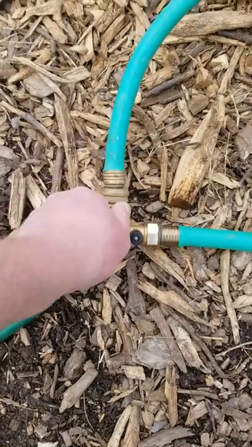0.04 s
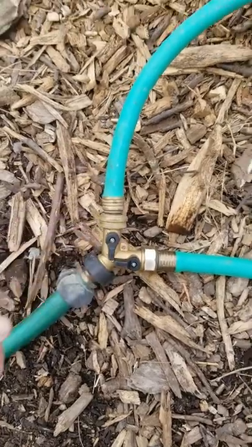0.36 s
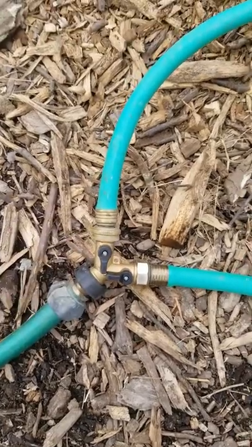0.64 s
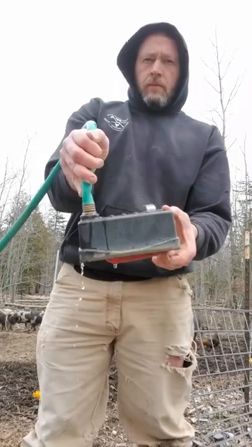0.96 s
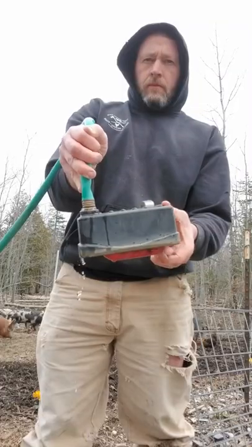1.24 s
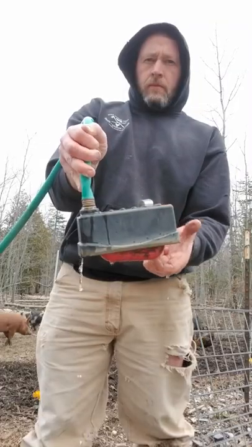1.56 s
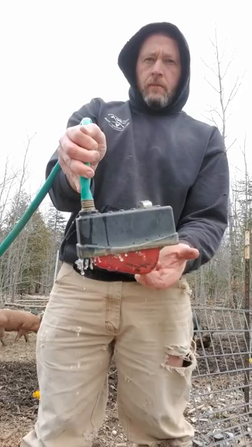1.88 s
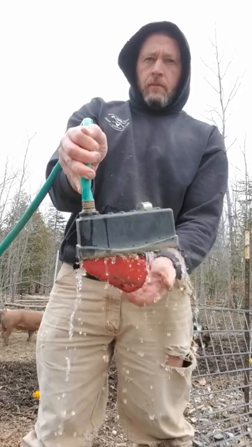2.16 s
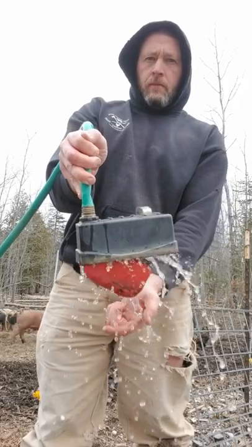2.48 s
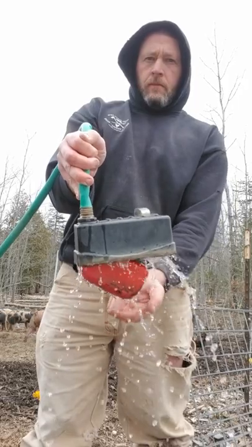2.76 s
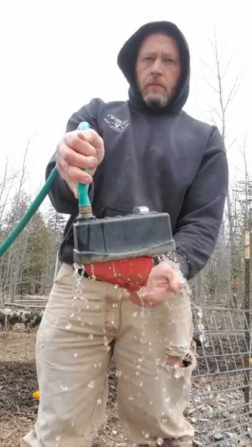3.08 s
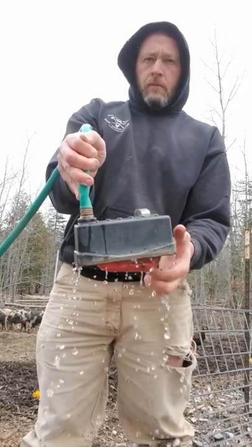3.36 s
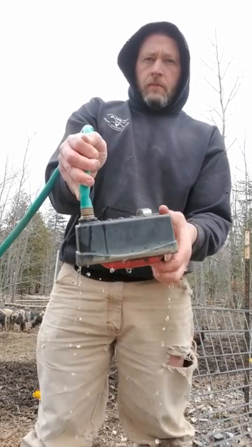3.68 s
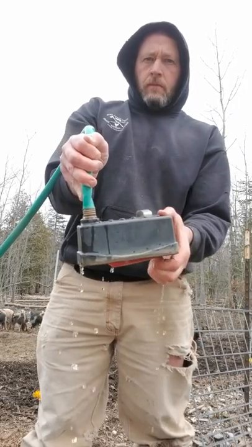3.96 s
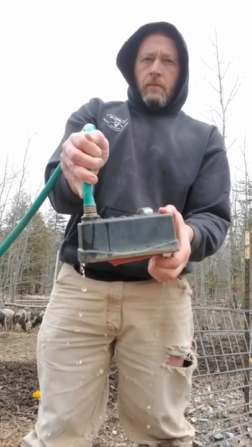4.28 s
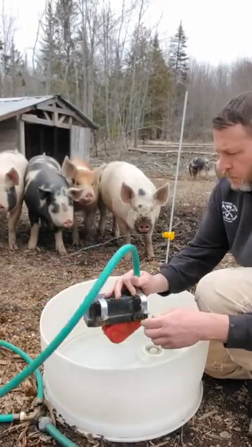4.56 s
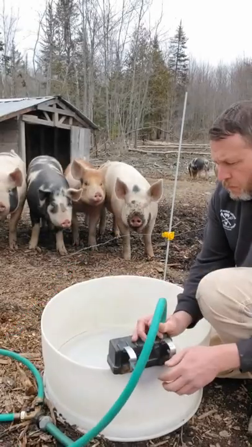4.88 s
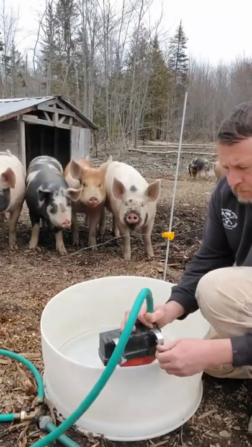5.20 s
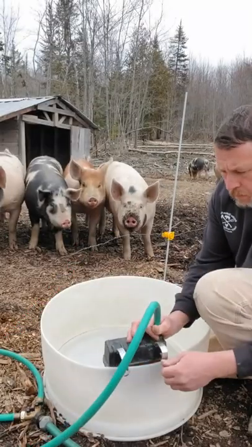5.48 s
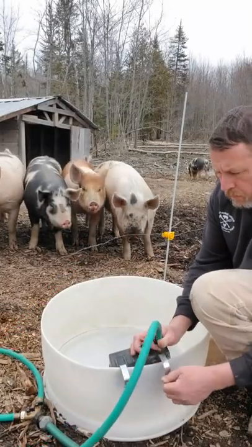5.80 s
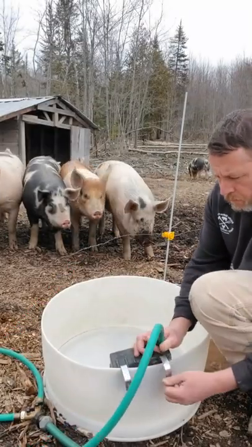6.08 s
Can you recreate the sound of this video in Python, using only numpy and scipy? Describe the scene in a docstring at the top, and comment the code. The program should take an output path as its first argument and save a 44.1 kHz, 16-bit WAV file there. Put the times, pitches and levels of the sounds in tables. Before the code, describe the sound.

Light wind rumbles on the microphone throughout, outdoors in a farmyard. At the start a brass hose tap opens: water surges into the hose with a hiss and a faint whistle that sink in pitch, cutting off at about 0.75 seconds. A few faint drips follow. At 1.7 seconds water starts spraying inside a plastic float valve, with a fine fizz, and from about 2.2 seconds big drops slap and patter on the ground. The spray closes off by 3.5 seconds and the drips thin out until about 4.7. A hen clucks hoarsely about four times a second from 1.6 to 4 seconds, then squawks once until 4.4. Around 4.8 seconds the valve clatters loudly onto the rim of an empty plastic tub, with a short hollow ring. More knocks, with light scraping and a rattle from its metal bracket, come near 5.6, 5.8 and 6.1 seconds.

```python
"""A hand-held float valve drips, sprays inside its plastic housing as the float drops, then shuts and
drips on the ground. Before it, a brass hose tap opens: its eddies hiss and whistle, water rushes in the
hose. A hen clucks over the spray and ends on a squawk. Last, the valve is knocked onto the rim of an
empty plastic tub, ringing wall and bracket. Light farmyard wind buffets the microphone throughout."""
import sys
import numpy as np
from scipy import signal
from scipy.fft import rfft, irfft
from scipy.io import wavfile
from scipy.ndimage import uniform_filter1d

SR = 44100
rng = np.random.default_rng(int(sys.argv[2]) if len(sys.argv) > 2 else 0)


def persist_wave(psi):
    """Save psi, clipped to +-1, as 16-bit WAV."""
    counts = np.round(np.clip(psi, -1, 1) * 32767).astype(np.int16)
    wavfile.write(sys.argv[1], SR, np.atleast_2d(counts).T)


N = 275184
T = np.arange(N) / SR

# breeze strength (time [s], level [dB])
BREEZE = [(0, -36.5), (.55, -39), (.9, -44.5), (1.5, -39), (2.2, -45.5), (2.6, -38.5), (3.3, -50),
          (3.75, -42.5), (4.4, -45.5), (5.25, -53.5), (5.6, -40.5), (6.24, -43.5)]
# strongest wind eddies (time [s], peak [dB], frequency [Hz])
WIND_PUFFS = [(0.066, -28, 59.6), (0.276, -27.5, 76), (.34, -25, 69), (.414, -26, 70.7),
              (0.516, -23.5, 64.5), (0.741, -28.5, 100), (1.402, -30.5, 116), (1.797, -29, 87),
              (3.162, -30, 70.4), (3.759, -30.5, 78), (4.395, -31.5, 91.5), (5.904, -26, 99.8)]
# wind rumble, yard hush (frequency [Hz], density [dB])
BUFFET_SPECTRUM = [(12, -30), (20, -12), (59, -1), (87, -1.5), (270, -22), (386, -32), (433, -38),
                   (451, -35), (600, -60.5), (780, -80), (1320, -120)]
YARD_SPECTRUM = [(290, -29.5), (500, -1.5), (570, -12.5), (649, -10.5), (698, -9.5), (2980, -25.5),
                 (6800, -19), (8960, -35), (12000, -19), (16000, -14.5)]

# clucks (centre [s], level [dB])
HEN_CLUCKS = [(1.632, -40.5), (1.848, -34), (2.068, -33.5), (2.302, -33), (2.553, -33), (2.821, -32),
              (3.069, -29.5), (3.35, -29), (3.681, -29.5), (3.955, -30)]
# squawk contour (time [s], pitch [Hz], level [dB], roughness [0-1])
HEN_SQUAWK = [(4.02, 407, -41, 0.48), (4.055, 494.1, -26.5, 0.39), (4.085, 526, -26.5, .15),
              (4.137, 516.4, -23, 0.01), (4.155, 471, -27.5, 0.08), (4.243, 461.6, -29, 0.17),
              (4.32, 566.7, -20.5, 0.03), (4.333, 520, -29.5, 0.76), (4.365, 538, -29.5, 0.6)]
# hen's throat (frequency [Hz], gain [dB])
THROAT_RESPONSE = [(250, -30.5), (480, -18), (700, -18.5), (950, -2.5), (1130, 3), (1450, -22.5),
                   (1950, -20.5), (2400, -14.5), (2800, -35.5), (3300, -55.5), (3800, -32), (4600, -46),
                   (5600, -31), (7000, -53)]

# hand grip on the valve, then blows on the tub (time [s], peak [dB], wall cutoff [Hz], contact [s], thud [dB],
# bracket [dB])
TUB_KNOCKS = [(4.565, -33.5, 2970, 0.022, -30, 6.5), (4.792, -32.5, 5058, 0.0085, -16, 0),
              (4.81, -7.5, 1266, 0.003, 2.5, -8.5), (4.8152, -5, 16160, 0.0035, -22.5, -11),
              (4.829, -12, 2000, 0.0034, -19, -9.5), (4.861, -23, 1190, .0063, -18, -20),
              (4.941, -22.5, 1005, 0.002, -5.5, -29), (5.5852, -12.5, 2640, 0.0054, 5, 5.5),
              (5.631, -15.5, 2600, 0.0062, -7, -2), (5.729, -40.5, 2480, .004, -13.5, 17),
              (5.8066, -18, 1240, 0.00091, -17, -30), (6.078, -43.5, 3050, 0.0064, -6, 10.5),
              (6.148, -20.5, 6060, 0.006, -2.5, -2), (6.221, -31.5, 4000, 0.014, -16, -8)]
# wall modes (frequency [Hz], level [dB], t60 [s])
WALL_MODES = [(199.4, -4.5, 0.27), (308.6, -13, .2), (385, -9.5, 0.15), (442, -8.5, 0.18),
              (483, -23.5, 0.25), (553, -3, 0.097), (604, 2.5, 0.067), (637, 2, 0.1), (754, -17, 0.063),
              (820.5, 7, 0.063), (862.5, 1, 0.12), (920, -19, 0.075), (1420, -12, 0.12), (1508, -1, 0.052),
              (1903, -6.5, 0.054), (1970, -24, 0.092), (2640, -2, .08), (3390, -12.5, .1),
              (5460, -28, 0.095)]
# whole tub flexing (frequency [Hz], t60 [s])
FLEX_MODES = [(183, 0.17), (217, .2)]
# metal bracket resonances (frequency [Hz], nominal width [Hz], level [dB])
BRACKET_MODES = [(1394, 266, 3), (1797, 220, -9.5), (2484, 220, -3.5), (2840, 440, -4), (5090, 720, -7.5),
                 (6980, 570, -8.5), (13600, 4000, -15.5)]
# bracket pushed along the rim (peak time [s], level [dB])
RIM_PUSHES = [(4.62, -51), (4.9, -46), (5.163, -53.5), (5.521, -54), (5.579, -35.5), (5.812, -46.5),
              (6.16, -53.5)]
# contact chatter, rim friction (frequency [Hz], density [dB])
CLACK_SPECTRUM = [(59, -40), (100, -19.5), (189, -7), (335, -13), (836, -15.5), (1170, -11), (1480, -15.5),
                  (1760, -31), (2580, -25), (2990, -34.5), (4770, -17.5), (8460, -45.5), (16000, -42)]
SCRAPE_SPECTRUM = [(120, -38), (200, -18), (373, -11.5), (851, -3), (950, -13.5), (1350, -11), (1870, -20),
                   (3900, -21), (5730, -26), (8580, -43), (16000, -35)]

# tap's glide as the lever turns (time [s], hiss centre [Hz], whistle pitch [Hz])
TAP_GLIDE = [(0, 2894, 3070), (.08, 3200, 3380), (.2, 3210, 3200), (.33, 2644, 2760), (.44, 2113, 2060),
             (.54, 1928, 2043), (.66, 1780, 1934), (.75, 1920, 2075)]
# hiss bands (multiple of centre [ratio], initial level [dB], open level [dB])
HISS_BANDS = [(1, -4, 1.5), (0.899, -13, 3.5), (1.197, -17, -12), (1.998, -11, -6), (2.14, -19, -10),
              (3.08, -17, -67)]
# eddies locking into a whistle (centre [s], level [dB], half length [s])
WHISTLE_SWELLS = [(0.284, -46, 0.053), (.485, -46, .045), (0.633, -50, 0.077), (0.75, -43.5, .04)]
# water in the hose (frequency [Hz], density [dB])
HOSE_SPECTRUM = [(180, -38), (300, -2), (885, 11), (1040, 3.5), (2030, -4), (2320, -18), (2570, 1),
                 (3130, -12), (3950, -9), (6960, -14.5), (9090, -34), (12300, -23), (16000, -29)]

# big drops on the ground (time [s], peak [dB], ring [Hz])
BIG_DROPS = [(1.0298, -45, 4860), (1.074, -49, 5490), (1.3484, -47.5, 6100), (1.6336, -42.5, 6660),
             (2.1547, -24.5, 2620), (2.4775, -18, 4000), (2.557, -21, 3580), (2.846, -17.5, 3900),
             (2.8752, -19.5, 3450), (3.246, -26, 4070), (3.2551, -20.5, 2750), (3.2795, -23, 4150),
             (3.3493, -28.5, 6700), (3.408, -15.5, 5300), (3.4189, -22.5, 3160), (3.482, -21, 2965),
             (3.5102, -31, 11698), (3.5337, -30.5, 5960), (3.606, -38, 6980), (3.6436, -24.5, 3400),
             (3.6709, -25.5, 5950), (3.691, -24, 2520), (3.7911, -25.5, 4430), (3.8123, -25, 3060),
             (3.827, -30.5, 3680), (3.9154, -20, 5940), (3.9735, -27, 11700), (4.0893, -24, 2500),
             (4.2544, -30.5, 2498), (4.278, -31, 2498), (4.5208, -31.5, 5870), (4.744, -39.5, 3068)]
# squirts at closing (centre [s], level [dB], half length [s], frequency [Hz], stage width [Hz])
VALVE_SQUIRTS = [(3.248, -38, 0.011, 3580, 1491), (3.287, -46, 0.0082, 428, 90)]
# housing cavity resonances (frequency [Hz], width [Hz], level [dB])
HOUSING_MODES = [(838.6, 45, -2.5), (1310, 120, -8.5), (2660, 190, -24), (3210, 150, -9.5),
                 (3660, 530, -7.5), (4240, 340, -8.5)]
# drop splat, fine mist, valve jet (frequency [Hz], density [dB])
SPLAT_SPECTRUM = [(880, -39), (1500, -17.5), (2160, -13.5), (3000, -8), (4830, -7), (6960, -2), (9560, -21),
                  (10800, -8.5), (12400, -11), (16000, -21)]
MIST_SPECTRUM = [(2940, -12.5), (5000, -15.5), (6100, -1.5), (9410, 0), (11100, 3), (12300, 5.5),
                 (15200, 9.5), (16000, -38)]
JET_SPECTRUM = [(120, -51), (200, -44), (384, -19), (496, -14.5), (682, -14), (812, -2), (938, -13),
                (1310, -10.5), (2110, -8.5), (2290, -4), (2900, -11.5), (3200, -7), (7090, -25),
                (9000, -37), (11700, -74), (19800, -120)]

FLOAT_DROP_S, OPENING_S = 1.715, 0.12
FLOAT_SHUT_S, CLOSING_S = 3.525, 0.52


def undb(db):
    """Decibels to gain."""
    return 10 ** (np.asarray(db) / 20)


def unit(x):
    """Scale to rms 1."""
    return x / np.sqrt(np.mean(x ** 2) + 1e-20)


def noise():
    """White noise, scene length."""
    return rng.standard_normal(N)


def curves(table):
    """Columns interpolated linearly over time."""
    times_s, *columns = np.transpose(table)
    return [np.interp(T, times_s, column) for column in columns]


def gate(start_s, end_s, edge_s):
    """Window with linear edges."""
    return np.clip((T - start_s) / edge_s, 0, 1) * np.clip((end_s - T) / edge_s, 0, 1)


def ramp(start_s, length_s):
    """Smooth rise, 0 to 1."""
    return np.sin(np.pi / 2 * np.clip((T - start_s) / length_s, 0, 1)) ** 2


def swell(centre_s, half_s):
    """Gaussian envelope."""
    return np.exp(-((T - centre_s) / half_s) ** 2)


def decay(t, t60_s):
    """Exponential fall, 60 dB per t60_s."""
    return np.exp(-np.log(1000) * t / t60_s)


def walk(rate_hz):
    """Smooth random wander, rms 1."""
    step = max(int(SR / rate_hz), 1)
    held = np.repeat(rng.standard_normal(N // step + 1), step)
    return unit(uniform_filter1d(held, step)[:N])


def gain_at(hz, spectrum):
    """Spectrum gain, interpolated over log frequency."""
    points_hz, db = np.transpose(spectrum)
    return undb(np.interp(np.log(hz + 1), np.log(points_hz), db))


def colour(x, spectrum):
    """Minimum-phase filter with the given spectrum."""
    size = 8192
    cepstrum = irfft(np.log(gain_at(np.arange(size // 2 + 1) * SR / size, spectrum)))
    cepstrum[1:size // 2] *= 2
    cepstrum[size // 2:] = 0
    impulse = irfft(np.exp(rfft(cepstrum)))[:size // 2]
    return signal.fftconvolve(x, impulse)[:len(x)]


def resonate(x, hz, width_hz):
    """One resonance, unity peak gain."""
    return signal.lfilter(*signal.iirpeak(hz, hz / width_hz, fs=SR), x)


def band(x, hz, width_hz, second_width_hz=None):
    """Two resonators in series, output rms 1."""
    return unit(resonate(resonate(x, hz, width_hz), hz, second_width_hz or width_hz))


def lowpass(x, hz):
    """Two-pole low-pass."""
    return signal.lfilter(*signal.butter(2, hz, fs=SR), x)


def add(out, start_s, x):
    """Mix x in at start_s."""
    i = int(start_s * SR)
    out[i:i + len(x)] += x[:N - i]


def place(x, pan_db, lag_ms, wet_db, t60_s):
    """Stereo direct sound plus scattered reflections; pan and lag are left relative to right."""
    t = T[:SR // 2]
    left = np.roll(x, round(lag_ms * SR / 1000))
    tails = rng.standard_normal((2, len(t))) * decay(t, t60_s) * (t > .002)
    tails /= np.linalg.norm(tails, axis=1, keepdims=True)
    wet = signal.fftconvolve(x[None], tails, axes=1)[:, :N]
    return (np.array([left, x]) + undb(wet_db) * wet) * undb([[pan_db / 2], [-pan_db / 2]])


def wind():
    """Gusts buffet each microphone port separately, over the yard's hush."""
    gust = undb(curves(BREEZE)[0] + 1.5 * walk(12))
    ports = []
    for _ in range(2):
        rumble = gust * unit(colour(noise() * undb(5.1 * walk(25)), BUFFET_SPECTRUM))
        for time_s, db, hz in WIND_PUFFS:  # about one pressure swing per eddy
            phase = 2 * np.pi * hz * (T - time_s) + 0.62 * rng.standard_normal()
            rumble += undb(db) * swell(time_s, 0.62 / hz) * np.cos(phase)
        hush = undb(-66) * unit(colour(noise(), YARD_SPECTRUM))
        ports.append(rumble + hush)
    return np.array(ports) * undb([[-.7], [.7]])


def syrinx(hz, rough):
    """Harmonics shaped by the throat; roughness shakes pitch and level and adds rasp."""
    jitter = 1 + .045 * rough * walk(420) + .009 * walk(110)
    phase = 2 * np.pi * np.cumsum(hz * jitter) / SR
    tone = sum(gain_at(k * hz, THROAT_RESPONSE) * np.sin(k * phase) for k in range(1, 15))
    tone /= np.sqrt(uniform_filter1d(tone ** 2, SR // 100) + 1e-9)
    rattle = 1 + 1.04 * rough * np.sin(0.33 * phase + 1.6 * walk(90))  # second, slower membrane
    rasp = unit(colour(noise() * (1 + np.cos(phase)), THROAT_RESPONSE))
    hiss = band(noise(), 2200, 1100) * undb(-15)
    shimmer = undb(2 * rough * walk(260))
    return tone * rattle * shimmer + (.14 + .7 * rough) * rasp + rough * hiss


def hen():
    """Hoarse clucks arch and droop in pitch, then one squawk; shed and trees echo."""
    cluck_hz, droop, arch = 499, .15, .45
    first_half_span_s, growth = .058, .02
    hz, envelope = np.full(N, float(cluck_hz)), np.zeros(N)
    for k, (centre_s, db) in enumerate(HEN_CLUCKS):
        offset = (T - centre_s) / (first_half_span_s * (1 + growth * k))
        near = np.abs(offset) < 1
        offset = offset[near]
        hz[near] = cluck_hz * (1 - droop * offset - arch * offset ** 2).clip(.5)
        envelope[near] += undb(db) * np.exp(-(offset / 0.29) ** 2)
    clucks = lowpass(envelope * syrinx(hz, rough=.38), 1550)  # beak nearly shut
    squawk_hz, squawk_db, rough = curves(HEN_SQUAWK)
    calls = clucks + undb(squawk_db) * gate(3.98, 4.388, 0.02) * syrinx(squawk_hz, rough)
    shed = undb(-12.5) * np.roll(calls, int(0.034 * SR))
    trees = place(calls, pan_db=-2.5, lag_ms=0, wet_db=21, t60_s=0.68) * undb(-36)
    # trees still ringing from an earlier call
    far_ring = band(noise(), 1040, 280) * undb(-68) * ramp(.755, 0.014) * decay(T - .755, 2)
    return place(calls + shed + far_ring, pan_db=0.7, lag_ms=-.07, wet_db=-28.5, t60_s=0.3) + trees


def knock(cutoff_hz, contact_s, thud_db, bracket_db):
    """One blow rings tub wall and bracket; longer contact, slower attack. Peak 1."""
    t = T[:SR // 2]
    mode_hz, mode_db, t60_s = np.transpose(WALL_MODES)[:, :, None]
    # random strike point
    weights = undb(mode_db + 0.86 * rng.standard_normal(mode_db.shape))
    weights *= rng.choice([-1, 1], mode_db.shape)
    ring = np.sum(weights * np.sin(2 * np.pi * mode_hz * t) * decay(t, t60_s), axis=0)
    chatter = rng.standard_normal(len(t)) * (decay(t, 8 * contact_s) + undb(-19) * decay(t, 0.17))
    wall = lowpass(unit(ring) + unit(colour(chatter, CLACK_SPECTRUM)), cutoff_hz)
    thud = unit(sum(np.sin(2 * np.pi * hz * t) * decay(t, ring_s) for hz, ring_s in FLEX_MODES))
    bracket = unit(sum(undb(db) * band(chatter, hz, width_hz, 2 * width_hz)
                       for hz, width_hz, db in BRACKET_MODES))
    attack = 1 - decay(t, 2.13 * contact_s)
    blow = (wall + undb(thud_db) * thud + undb(bracket_db - 1) * bracket) * attack
    return blow / np.abs(blow).max()


def tub():
    """The valve clatters on the tub; its bracket scrapes the rim and squeaks once."""
    rise_db_per_s, fall_db_per_s = 203.5, 198
    knocks = np.zeros(N)
    for time_s, db, *contact in TUB_KNOCKS:
        add(knocks, time_s, undb(db) * knock(*contact))
    friction = noise() * undb(1.85 * rng.exponential(size=N) + 2.34 * walk(110))
    pressure = sum(undb(db - np.maximum(rise_db_per_s * (peak_s - T), fall_db_per_s * (T - peak_s)))
                   for peak_s, db in RIM_PUSHES)
    scrape = unit(colour(friction, SCRAPE_SPECTRUM)) * pressure
    squeak = band(friction, 5200, 670, 840) * undb(-48.5) * gate(5.495, 5.56, .02)
    return place(knocks + scrape + squeak, pan_db=3.5, lag_ms=.1, wet_db=-9, t60_s=0.088)


def tap():
    """Ball-valve eddies hiss and whistle, sinking as the gap widens; water surges into the hose."""
    centre_hz, whistle_hz = curves(TAP_GLIDE)
    opening = ramp(start_s=0.23, length_s=0.43)
    phase = 2 * np.pi * np.cumsum(centre_hz) / SR
    hiss = np.zeros(N)
    for multiple, first_db, open_db in HISS_BANDS:
        baseband = lowpass(noise() + 1j * noise(), 110 * np.sqrt(multiple))
        eddies = unit(np.real(baseband * np.exp(1j * multiple * phase)))
        hiss += undb(first_db + (open_db - first_db) * opening) * eddies
    hiss *= undb(-47 - 5.5 * opening + 0.81 * walk(110.8))
    lock = sum(undb(db) * swell(centre_s, half_s) for centre_s, db, half_s in WHISTLE_SWELLS)
    whistle_phase = 2 * np.pi * np.cumsum(whistle_hz) / SR + .85 * walk(110)
    whistle = np.sqrt(2) * np.sin(whistle_phase) * lock * undb(3 * walk(70))
    rush = unit(colour(noise(), HOSE_SPECTRUM))
    rush += undb(-3) * unit(resonate(noise(), 950, 130)) * decay(T, 1.3)
    rush *= undb(-46.5 - 10 * opening)
    surge = band(noise(), 770, 270)
    surge = unit(resonate(resonate(noise(), 770, 270), 360, 570)) * undb(-24.5) * decay(T, 0.15)
    bubbles = unit(colour(noise() * undb(3.8 * walk(118.5)), MIST_SPECTRUM))
    bubbles *= undb(-68.5) * (1 - .5 * opening)
    water = (hiss + whistle + rush + surge + bubbles) * gate(0, 0.7534, 0.00078)
    return place(water, pan_db=-1.5, lag_ms=.36, wet_db=1, t60_s=0.021)


def valve_flow():
    """The float falls open, then is lifted shut: 0 shut, 1 open."""
    return ramp(FLOAT_DROP_S, OPENING_S) * np.clip((FLOAT_SHUT_S - T) / CLOSING_S, 0, 1)


def drips():
    """Big drops slap the ground; droplets patter as the housing drains and leaks."""
    drain_s, fall_s = 0.49, 0.3
    full_flow_drops_per_s, leak_drops_per_s = 420, 30
    t, splats = T[:SR // 16], np.zeros(N)
    for time_s, db, hz in BIG_DROPS:
        burst = rng.standard_normal(len(t)) * (decay(t, .0025) + undb(-18) * decay(t, .028))
        splat = colour(burst, SPLAT_SPECTRUM)
        splat = resonate(splat, hz, 0.22 * hz) + undb(-9.5) * splat
        add(splats, time_s, undb(db) * splat / np.abs(splat).max())
    pole = np.exp(-1 / (drain_s * SR))
    runoff = signal.lfilter([1 - pole], [1, -pole], valve_flow())
    landing = np.interp(T - fall_s, T, runoff)
    sizes = undb(5 * np.minimum(rng.exponential(size=N), 3))
    droplets = (rng.random(N) < (full_flow_drops_per_s * landing + leak_drops_per_s) / SR) * sizes
    fizz = noise() * signal.fftconvolve(droplets, decay(t, .012) + undb(-13) * decay(t, .055))[:N]
    patter = unit(colour(fizz, SPLAT_SPECTRUM)) + undb(-9) * unit(colour(fizz, MIST_SPECTRUM))
    patter *= (undb(-58) * np.sqrt(landing) + undb(-80)) * gate(.76, 4.75, 0.041)
    return (place(splats, pan_db=5, lag_ms=.28, wet_db=-5, t60_s=0.025)
            + place(patter, pan_db=1.5, lag_ms=0, wet_db=-7, t60_s=.03))


def squirts():
    """The last water squeezes through the closing valve; the housing gulps."""
    water = sum(band(noise(), hz, width_hz) * undb(db) * swell(centre_s, half_s)
                for centre_s, db, half_s, hz, width_hz in VALVE_SQUIRTS)
    return place(water, pan_db=3.5, lag_ms=0, wet_db=-6, t60_s=0.023)


def spray():
    """The jet rings the housing cavity, softening as it floods; mist fizzes out underneath."""
    jet_db, sag_db_per_s, mist_db = -38.5, 3.5, -51
    flow = valve_flow()
    impacts = unit(noise() * undb(rng.exponential(size=N) + 4.3 * walk(120)))
    # two stages at 1.56 x width give the listed width
    cavity = sum(undb(db) * band(impacts, hz, 1.56 * width_hz) for hz, width_hz, db in HOUSING_MODES)
    churn = noise() * undb(1.4 * walk(90))
    jet = unit(colour(churn, JET_SPECTRUM)) + undb(-2.5) * unit(cavity)
    jet *= flow * undb(jet_db - sag_db_per_s * (T - FLOAT_DROP_S))
    fizz = noise() * undb(2.5 * rng.exponential(size=N) + 2.2 * walk(150))
    mist = unit(colour(fizz, MIST_SPECTRUM)) * flow ** 0.52 * undb(mist_db)  # persists at low flow
    return place(jet + mist, pan_db=.3, lag_ms=0, wet_db=-7.5, t60_s=.025)


def scene():
    """Stereo sum of all sources."""
    return tap() + spray() + squirts() + drips() + hen() + tub() + wind()


def record(dry):
    """The phone's steep treble cut."""
    cutoff_hz = 16100
    return signal.sosfilt(signal.ellip(10, .2, 70, cutoff_hz, fs=SR, output="sos"), dry)


dry = scene()
out = record(dry)
persist_wave(out)
```